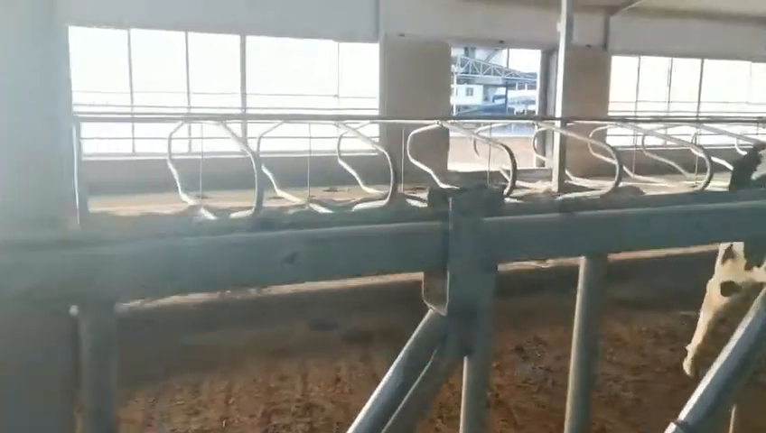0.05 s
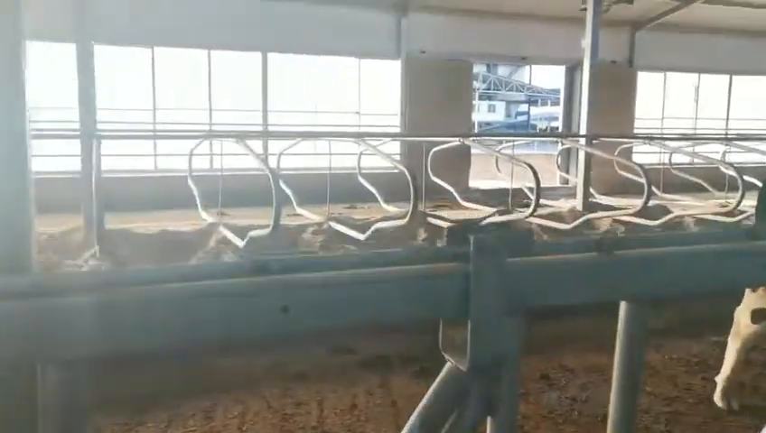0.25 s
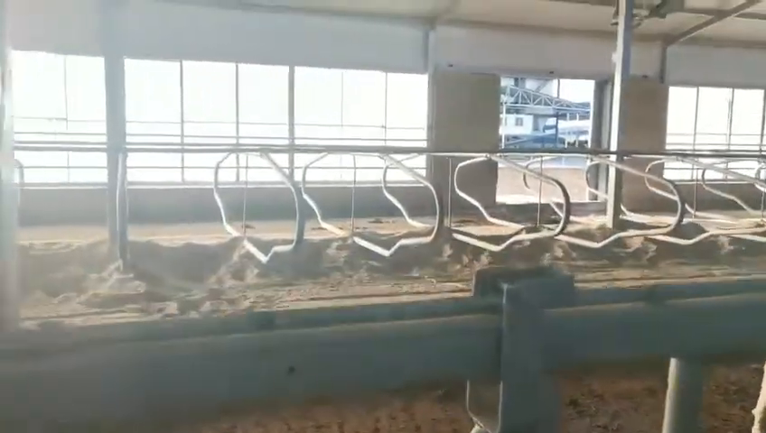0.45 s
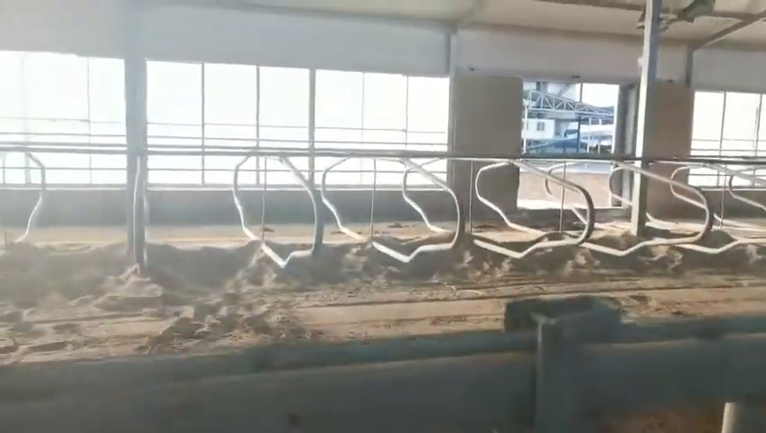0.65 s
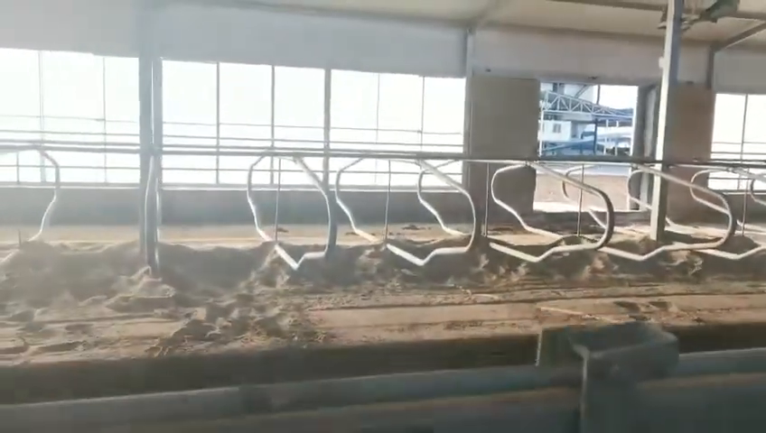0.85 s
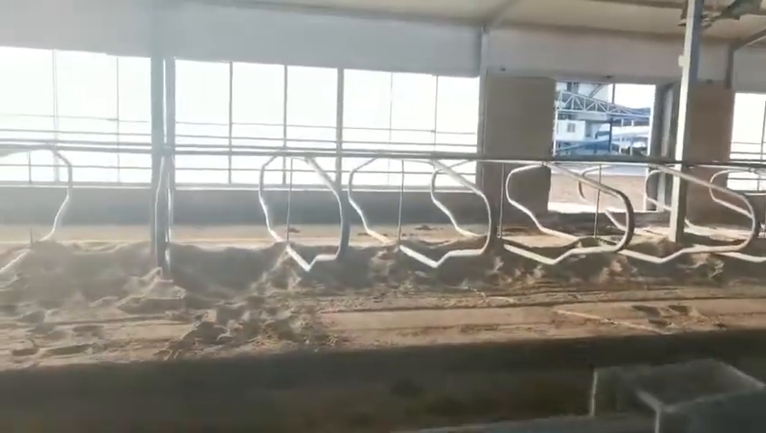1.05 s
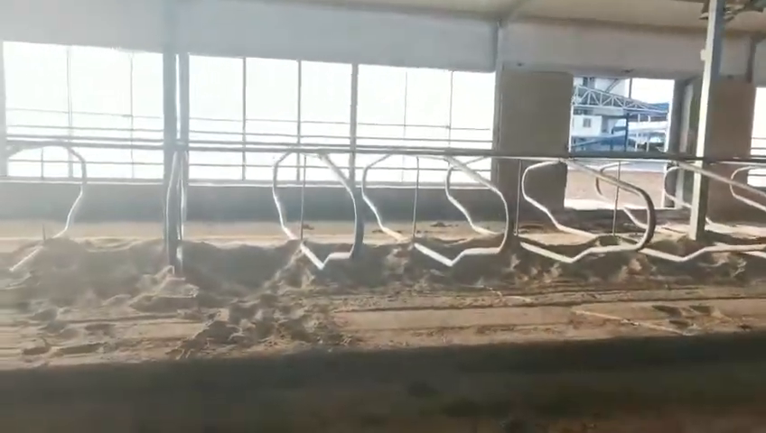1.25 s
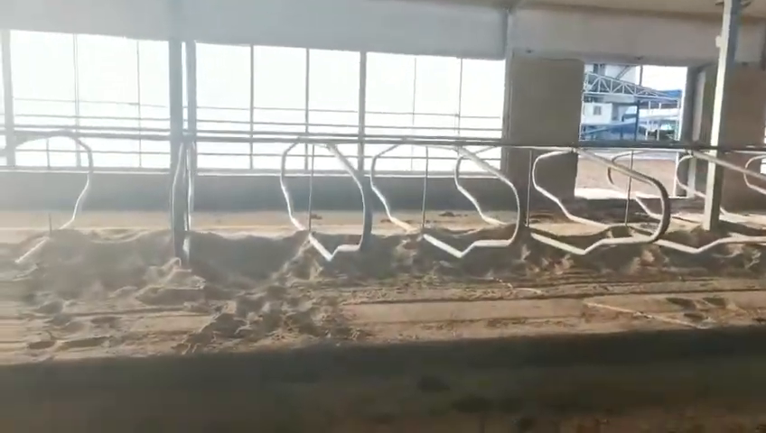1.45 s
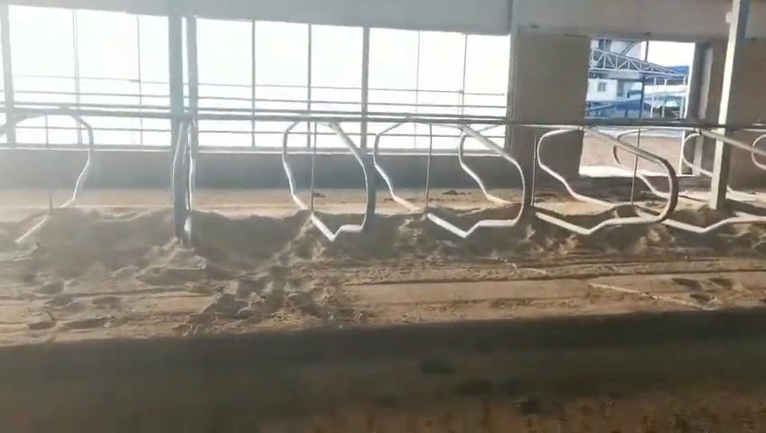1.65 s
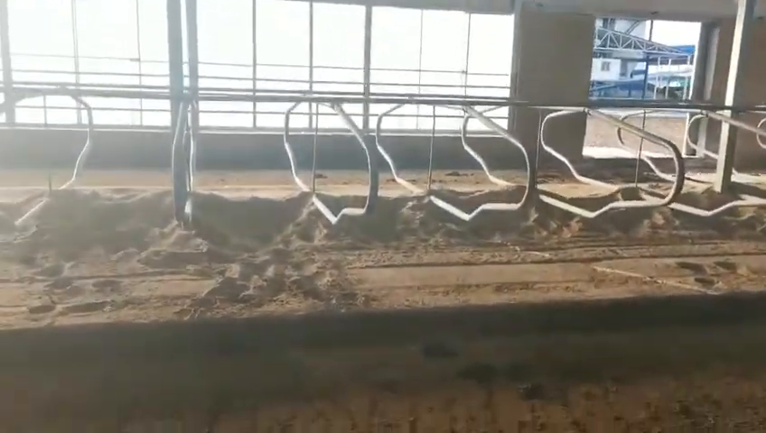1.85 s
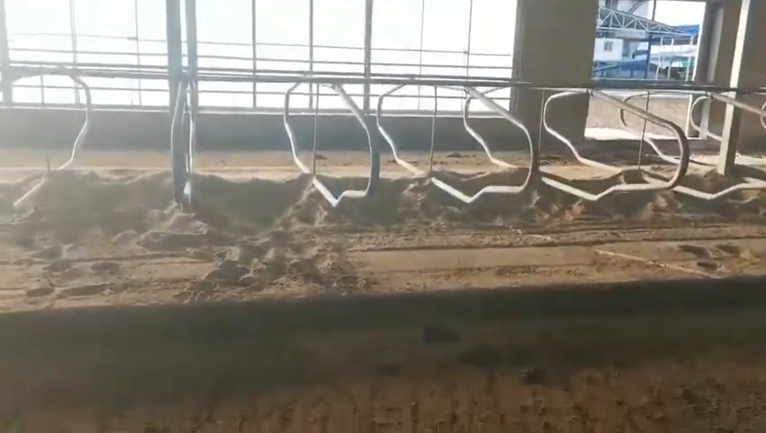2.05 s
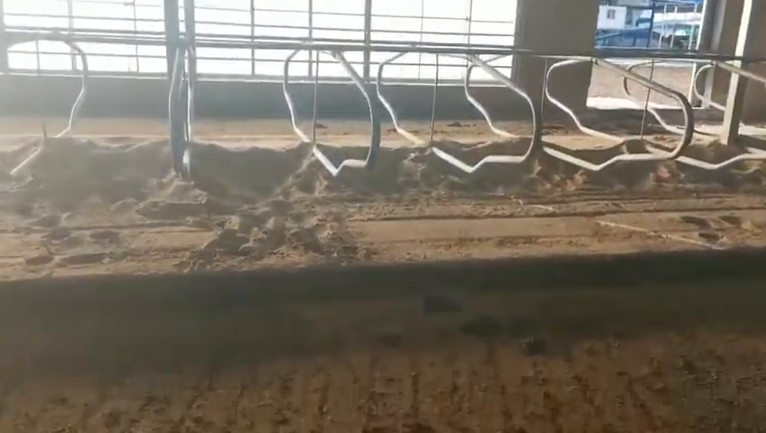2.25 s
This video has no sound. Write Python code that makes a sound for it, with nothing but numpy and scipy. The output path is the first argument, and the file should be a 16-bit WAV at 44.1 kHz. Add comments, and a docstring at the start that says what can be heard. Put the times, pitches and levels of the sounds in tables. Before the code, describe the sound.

In an echoing livestock barn, a metal gate rattles loosely, rasps and bangs with a ringing decay, followed by a cluster of latch clinks. It is a little right of the microphone, with a faint motor hum behind.

```python
"""A latch clinks, then a loose steel bar rattles in its frame, a little to the right in a livestock barn.
The gate of a feed barrier scrapes, slams and rings on, and the latch clinks again. Each impact excites
damped modes of the steel: sparse ones are decaying sinusoids, dense ones decaying bands of noise.
Stick-slip friction rasps and squeals. The hall reverberates over a low rumble and a distant motor hum."""
import sys
import numpy as np
from scipy import signal
from scipy.fft import rfft, irfft
from scipy.io import wavfile
from scipy.ndimage import uniform_filter1d

SR = 44100
rng = np.random.default_rng(int(sys.argv[2]) if len(sys.argv) > 2 else 0)


def wav_out(sig):
    """Save sig, one row per channel (or a flat mono array), as 16-bit PCM at SR to the path in sys.argv[1]."""
    wavfile.write(sys.argv[1], SR, np.round(np.clip(np.atleast_2d(sig).T, -1, 1) * 32767).astype(np.int16))


N = 105840
T = np.arange(N) / SR


def amp(db):
    """Amplitude ratio of a level in decibels."""
    return 10 ** (np.asarray(db) / 20)


def unit(x):
    """Normalisation to rms 1."""
    return x / np.sqrt(np.mean(x ** 2) + 1e-20)


def read(points, hz):
    """Interpolation on a logarithmic frequency axis."""
    f, value = np.transpose(points)
    return np.interp(np.log(hz + 1), np.log(f + 1), value)


def fade(t, t60):
    """Damping: exponential decay by 60 dB in t60 seconds."""
    return np.exp(-np.log(1000) * t / np.maximum(t60, .005))


def rise(t, tau_s):
    """First-order build-up with time constant tau_s."""
    return 1 - np.exp(-t / tau_s)


def pan(db):
    """Stereo gains for a level difference, left minus right."""
    return amp(np.array([[db], [-db]]) / 2)


def add(mix, s, sound):
    """Superposition of a sound starting at s seconds."""
    part = mix[:, max(round(s * SR), 0):][:, :sound.shape[1]]
    part += sound[:, :part.shape[1]]


def tilt(hz, db):
    """Spectral slope in dB per octave: harder contact excites more treble."""
    return amp(db * np.log2(np.clip(hz, 700, 9000) / 2400))


# Correlation between the two microphones: f/Hz, coefficient
CORRELATION = [(60, 0.7), (250, 0.85), (500, 0.64), (1000, 0.12), (2000, -0.08), (12000, 0)]
def noise(gain, size, tilt_db=0):
    """Random-phase noise of a given spectrum, partly coherent between the channels in the bass."""
    hz = np.fft.rfftfreq(size, 1 / SR)
    left, independent = np.exp(2j * np.pi * rng.random((2, len(hz))))
    correlation = np.clip(read(CORRELATION, hz), -1, 1)
    right = correlation * left + np.sqrt(1 - correlation ** 2) * independent
    magnitude = gain(hz)
    spectrum = np.array([left, right]) * magnitude * tilt(hz, tilt_db)
    return irfft(spectrum, size) * np.sqrt(size / np.mean(magnitude ** 2))


def body(points, size, tilt_db=0):
    """Modal overlap: overtones too dense to resolve act as noise with a spectral envelope."""
    return noise(lambda hz: amp(read(points, hz)), size, tilt_db)


def lorentzian(f, hz, width_hz):
    """Resonance curve, with its full width taken at half height."""
    return 1 / (1 + (2 * (f - hz) / width_hz) ** 2)


def resonance(hz, width_hz, size):
    """Beating of many modes near one pitch gives a rough, narrow-band ring."""
    return noise(lambda f: lorentzian(f, hz, width_hz), size)


def die_away(x, t60s, stretch=1):
    """Frequency-dependent damping: each band decays at its own rate."""
    hz, t, bands = signal.stft(x, SR, nperseg=256)
    damped = bands * fade(t, stretch * read(t60s, hz)[:, None])
    return signal.istft(damped, SR, nperseg=256)[1][:, :x.shape[1]]


def ring(modes, t, ratio, tilt_db):
    """Free vibration: damped modes reach the two microphones a quarter cycle apart."""
    shape = (len(modes), 1, 1)
    phases = 2 * np.pi * rng.random(shape) + rng.choice([-1, 1], shape) * np.array([[0], [np.pi / 2]])
    return sum(amp(db) * tilt(hz, tilt_db) * fade(t, t60) * np.sin(2 * np.pi * hz * ratio * t + phase)
               for (hz, db, t60), phase in zip(modes, phases))


# Background spectrum: f/Hz, level/dB
RUMBLE_SPECTRUM = [(20, -1.5), (45, -6), (90, 0), (170, -3), (300, -10.5), (600, -10.5), (1200, -13.5),
                   (2500, -15.5), (4500, -24), (8000, -30), (11000, -37.5), (15000, -65)]
def rumble():
    """Stationary noise with most of its power in the bass."""
    return amp(-51) * body(RUMBLE_SPECTRUM, N)


# Distant motor: t/s, f/Hz, level/dB
MOTOR_TRACK = [(0, 80.1, -53.5), (.17, 83.4, -44), (.24, 84.4, -58), (.38, 88.7, -56), (.46, 94.17, -43.5),
               (.65, 92.9, -51), (.9, 89.9, -52.5), (1.08, 89.9, -48.5), (1.398, 88.3, -60.5),
               (1.55, 87.1, -67), (2.4, 86.6, -62)]
def motor():
    """A drifting hum, its phase the integral of its frequency."""
    s, hz, db = np.transpose(MOTOR_TRACK)
    phase = 2 * np.pi * np.cumsum(np.interp(T, s, hz)) / SR
    return np.sqrt(2) * amp(np.interp(T, s, db)) * np.sin(phase)


# Reverberation time of the hall: f/Hz, T60/s
HALL_DECAY = [(100, 1.76), (700, 0.9), (2000, 1.22), (3500, 0.77), (6000, 0.47), (9000, 0.36),
              (14000, 0.21)]
def hall(x):
    """Diffuse reverberation: the mono sum is convolved with decaying noise."""
    build_up = rise(T, 0.011)
    tail = die_away(body([(20, 0), (20000, 0)], size=65536), HALL_DECAY)
    reference = np.sqrt(np.sum((fade(T, 1.2) * build_up) ** 2))
    response = tail * build_up[:tail.shape[1]] / reference
    mono = (x + x[::-1]) / 2
    return signal.fftconvolve(mono, response, axes=1)[:, :N] * np.sqrt(2)


# Booms: t/s, level/dB, f/Hz, T60/s
STRUCTURE_BOOMS = [(0.341, -43, 51, 0.48), (.415, -31, 70.4, .2), (1.01, -35.5, 59, 1),
                   (1.209, -40, 96, 0.45), (2.075, -45.5, 48.5, 0.59)]
def booms():
    """Low modes of the structure swell and decay freely."""
    out = np.zeros((1, N))
    onset = np.minimum(T / 0.04, 1)
    for s, db, hz, t60 in STRUCTURE_BOOMS:
        mode = np.sin(2 * np.pi * (hz * T + rng.random()))
        add(out, s, (amp(db) * onset * fade(T, t60) * mode)[None])
    return out


# Excitations of the rail: t/s, level/dB
RAIL_BLOWS = [(.448, -38.5), (.59, -69), (1.95, -42), (2.09, -56.5), (2.281, -51)]
def rail(hz=2056, t60=3.2):
    """One lightly damped mode of a long rail sings on after the knocks that shake it."""
    envelope = np.zeros((1, N))
    for s, db in RAIL_BLOWS:
        add(envelope, s, (amp(db) * fade(T, t60) * rise(T, 0.0041))[None])
    return envelope * np.sin(2 * np.pi * (hz * T + rng.random() + np.array([[0], [.2]])))


# Gate sliding along its bar: t/s, level/dB
SLIDE_LEVELS = [(.44, -64), (.49, -48), (.525, -39), (.58, -46), (.63, -76), (.79, -70), (0.836, -53.5),
                (.922, -45.5), (.94, -67)]
# Its rasp: f/Hz, level/dB
RASP_SPECTRUM = [(200, -26), (1200, -7), (2300, 3), (4500, 4), (6500, -10), (10000, -25), (15000, -69)]
def scrape(grit_db=2, grit_s=.003):
    """Stick-slip friction of steel on steel: noise with random amplitude modulation."""
    s, db = np.transpose(SLIDE_LEVELS)
    envelope = amp(np.interp(T, s, db)) * (T > s[0]) * (T < s[-1])
    roughness = unit(uniform_filter1d(rng.standard_normal(N), round(grit_s * SR)))
    return envelope * unit(amp(grit_db * roughness)) * body(RASP_SPECTRUM, N)


# Thin squeals: t/s, duration/s, f/Hz, level/dB
FRICTION_SQUEALS = [(.66, .11, 2930, -40), (1.98, .45, 2440, -52), (2.03, .25, 2745, -52),
                    (2.11, .25, 7870, -68), (2.24, .16, 4965, -55)]
def squeals(width_hz=45):
    """Friction excites narrow resonances of the steel, which swell and subside."""
    out, t = np.zeros((2, N)), T[:32768]
    for s, duration, hz, db in FRICTION_SQUEALS:
        swell = np.sin(np.pi * np.minimum(t / duration, 1))
        add(out, s, amp(db) * swell * resonance(hz, width_hz, len(t)))
    return pan(1) * out


# Clinks: t/s, level/dB, T60/s, tilt/(dB/octave), clatter/dB, catch/dB, bolt f/Hz, bolt/dB, pin/dB
LATCH_IMPACTS = [(.024, -16.5, 0.11, -5.5, 3.5, -10, 5440, -3, -18),
                 (.041, -14.5, 0.22, 3, 10, 8, 5600, 4.5, -4),
                 (.075, -24, 0.51, -2.5, 15, 7.5, 5600, -12, -14),
                 (.633, -8, 0.092, 3.5, 3.5, 11.5, 5650, 10, -7),
                 (1.9155, -3, .15, -5.5, -7.5, -38, 5540, -1, 4),
                 (1.935, -5.5, 0.13, -11.5, -7.5, -3, 5300, -3, -14),
                 (1.947, 1, 0.17, .5, -5.5, -5, 5660, 0, -8),
                 (1.96, -7.5, 0.34, -6.5, 3.5, 5, 5730, 3.5, -20),
                 (1.998, -11.5, 0.28, 1, 10.5, 9, 5750, -3, -18),
                 (2.04, -14, 0.51, -3, 9.5, -6, 5570, -21, -29),
                 (2.078, -14, 0.28, -4, 12.5, -8, 5430, -2, -28),
                 (2.124, -20.5, 0.67, -1.5, 13.5, -17, 5740, -7, -18),
                 (2.212, -21.5, 0.31, -1, 11, -18, 5360, 3, -17)]
# Latch resonances: f/Hz, width/Hz, level/dB
LATCH_RESONANCES = [(2078, 190, 0), (3850, 450, -9), (7760, 810, -13), (10760, 360, -29.5)]
# Clatter around them: f/Hz, level/dB
LATCH_SPECTRUM = [(100, -24), (250, -1.5), (400, -17.5), (620, -5.5), (1300, -1), (2400, 8.5), (3300, -7),
                  (4600, -0.5), (6800, -11.5), (8500, -18.5), (10000, -23), (15000, -52)]
def latch():
    """Impacts excite clusters of close modes in the latch, its catch, bolt and pin."""
    def peaks(f):
        return sum(amp(db) * lorentzian(f, hz, width) for hz, width, db in LATCH_RESONANCES)

    out, t = np.zeros((2, N)), T[:16384]
    for s, db, t60, tilt_db, clatter_db, catch_db, bolt_hz, bolt_db, pin_db in LATCH_IMPACTS:
        clink = amp(-31.5) * noise(peaks, len(t), tilt_db)
        catch = amp(-32 + catch_db) * resonance(hz=3200, width_hz=430, size=len(t))
        bolt = amp(-33.5 + bolt_db) * resonance(bolt_hz, width_hz=400, size=len(t))
        pin = amp(-44.5 + pin_db) * resonance(hz=8060, width_hz=160, size=len(t))
        clatter = amp(-34 + clatter_db) * body(LATCH_SPECTRUM, len(t), tilt_db)
        envelope = amp(db) * rise(t, 0.002) * fade(t, t60)
        add(out, s, envelope * (clink + catch + bolt + pin + clatter))
    return pan(-1) * (out + amp(-2.5) * hall(out))


# Knocks: t/s, level/dB, nominal f/Hz, tilt/(dB/octave), ring/dB, hollow tube/dB
BAR_IMPACTS = [(0.127, -10.5, 2190, -0.5, -2, -1), (.168, -10.5, 1984, -2.5, 3.5, 1.5),
               (.212, -7.5, 1920, 2, -2, 2.5), (.2305, -2, 2443, 3.5, 6.5, 2),
               (.248, -7, 2450, 5.5, 9, 13.5), (.279, 1.5, 2492, 1.5, 1.5, 6.5),
               (.293, -4, 2500, 7.5, -8, 5), (.316, -2.5, 2463, -5, 10.5, -9),
               (.336, -8, 2434, 4.5, 13, 17.5), (.368, -4, 2460, 2.5, 5, 1.5),
               (.408, -4.5, 2360, -7.5, -5, 6), (.448, -0.5, 2400, -1, -5, 0.5),
               (.468, -3.5, 2420, 1.5, 4, 2.5), (.49, 0, 2560, -1, 1.5, -11),
               (.508, -6, 2566, -3, 10.5, 2.5), (.52, -1.5, 2420, -1, 3.5, -17),
               (.538, -6.5, 2580, -1, 9, -18), (.575, -4, 2417, -6, 10.5, -19)]
# Modes of the bar at its nominal pitch: f/Hz, level/dB, T60/s
BAR_PARTIALS = [(1340, -26, 0.053), (2410, 2, 0.067), (4730, -17, 0.081), (5200, -20.5, 0.072)]
# Its dense overtones: f/Hz, level/dB
BAR_SPECTRUM = [(100, -19.5), (300, -17.5), (520, -16.5), (710, -18), (950, -9), (1400, 4), (1750, 0.5),
                (2350, 6.5), (3300, -4.5), (5000, -9), (7500, -16.5), (10000, -31.5), (12000, -51),
                (15000, -54)]
def loose_bar(nominal_hz=2430):
    """Repeated impacts of a hollow bar in its frame excite heavily damped modes."""
    clatter, pings, t = np.zeros((2, N)), np.zeros((2, N)), T[:16384]
    for s, db, hz, tilt_db, ring_db, tube_db in BAR_IMPACTS:
        blow = amp(db) * rise(t, 0.0019)
        dense = amp(-31) * body(BAR_SPECTRUM, len(t), tilt_db)
        hollow = amp(-44.5 + tube_db) * resonance(hz=754, width_hz=230, size=len(t))
        add(clatter, s, blow * (dense + hollow) * fade(t, t60=0.16))
        add(pings, s, blow * amp(-29.5 + ring_db) * ring(BAR_PARTIALS, t, hz / nominal_hz, tilt_db))
    echo = hall(amp(3.5) * clatter + amp(-7) * pings)
    return pan(-0.5) * (clatter + pings + echo)


# Slams: t/s, level/dB, T60 ratio, tilt/(dB/octave), left minus right/dB, tube f/Hz, tube/dB, frame/dB
GATE_IMPACTS = [(.65, -1.5, 0.32, 0.9, -5, 587, -34.5, -12), (.9252, 0.5, 1, 1, 2, 744, -40.5, -3),
                (.951, 0, 0.65, 0.5, 4, 694, -26, -27), (1.03, -8.5, 1, -1, -1.5, 866, -32, -6.5),
                (1.085, -12, 1, -4.5, 1, 805, -27, -7), (1.205, -25.5, 0.6, -6.5, -12, 826, -19.5, 13.5),
                (1.243, -17, 0.24, -7.5, -4, 860, -31, 3.5), (1.292, -21, 0.092, -5, 5, 780, -35, 1),
                (1.585, -30, 0.24, -3, 3, 1350, -18, -7)]
# Modes of the gate frame: f/Hz, level/dB, T60/s
FRAME_MODES = [(339, -5, 1.2), (664, -7, .9), (705, -5, 1.2), (815, 1.5, 1.35), (921, -6, 1.3),
               (1087, -9, 1.4), (1315, -2.5, 1.6), (1375, 1, 1.2), (1502, -1.5, .8), (1681, .5, .9),
               (2051, 2, .65), (2149, 5.5, 1.1), (2213, -4, 1.5), (2304, -1.5, .9), (2379, -.5, 1.1),
               (2573, -3, .9), (2674, -3, 1.3), (2762, -2, 1), (2885, -3, .9), (4323, -7, .7),
               (5093, -7, .7), (5765, -3, .6), (6890, -5, .55), (7057, -3, .55), (7704, -4, .55)]
# Its dense overtones: f/Hz, level/dB
GATE_SPECTRUM = [(60, -13.5), (160, -12), (300, -10), (470, -8), (700, 1), (1090, -4), (1350, 1),
                 (1850, -3.5), (2200, -1), (3050, -3.5), (3600, -7), (5000, -7.5), (5900, -4.5),
                 (6300, -11), (7700, -8), (8200, -12.5), (10500, -20), (12500, -32.5), (15000, -33)]
# Their decay: f/Hz, T60/s
GATE_DECAY = [(200, 0.57), (800, 0.81), (2200, 1), (5000, 0.76), (8000, 0.5), (13000, 0.23)]
def gate():
    """Slams and rebounds set the frame in free vibration, damped sooner when the gate is held."""
    crash, frame, t = np.zeros((2, N)), np.zeros((2, N)), T[:49152]
    for s, db, stretch, tilt_db, pan_db, tube_hz, tube_db, frame_db in GATE_IMPACTS:
        blow = amp(db) * rise(t, 0.0028)
        dense = amp(-23.2) * die_away(body(GATE_SPECTRUM, len(t), tilt_db), GATE_DECAY, stretch)
        hollow = amp(tube_db) * resonance(tube_hz, width_hz=35, size=len(t)) * fade(t, 0.53 * stretch)
        add(crash, s, pan(pan_db) * blow * (dense + hollow))
        modes = [(hz, mode_db, t60 * stretch) for hz, mode_db, t60 in FRAME_MODES]
        add(frame, s, blow * amp(-34 + frame_db) * ring(modes, t, 1, tilt_db / 2))
    return crash + frame + pan(0.5) * amp(-4.5) * hall(crash)


def scene():
    """Linear superposition of the metalwork and the background of the barn."""
    metalwork = loose_bar() + latch() + gate() + rail() + scrape() + squeals()
    return metalwork + booms() + motor() + rumble()


# Balance of the microphones: f/Hz, left minus right/dB
LEVEL_DIFFERENCE = [(60, -3.5), (250, -1.5), (700, -0.5), (1300, -1.5), (2200, -9), (4000, 0), (7500, -8.5),
                    (13000, 8.5)]
def record(dry, cutoff_hz=15200):
    """A level difference favours the right microphone in most bands; a low-pass limits the bandwidth."""
    lean_db = read(LEVEL_DIFFERENCE, np.fft.rfftfreq(2 * N, 1 / SR))
    gains = amp(np.array([lean_db, -lean_db]) / 2)
    balanced = irfft(rfft(dry, 2 * N) * gains)[:, :N]
    low_pass = signal.firwin(511, cutoff_hz, window=("kaiser", 9), fs=SR)
    return signal.oaconvolve(balanced, low_pass[None], "same")


dry = scene()
out = record(dry)
wav_out(out)
```